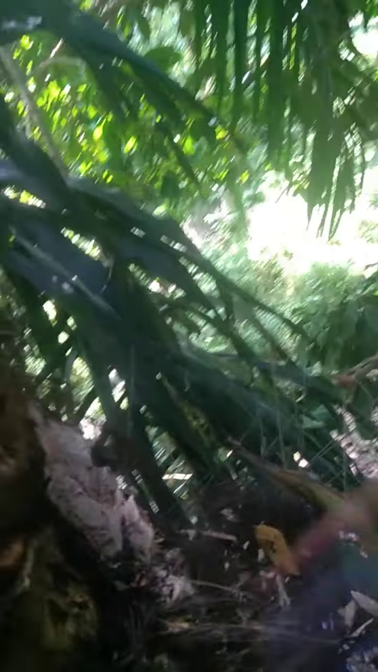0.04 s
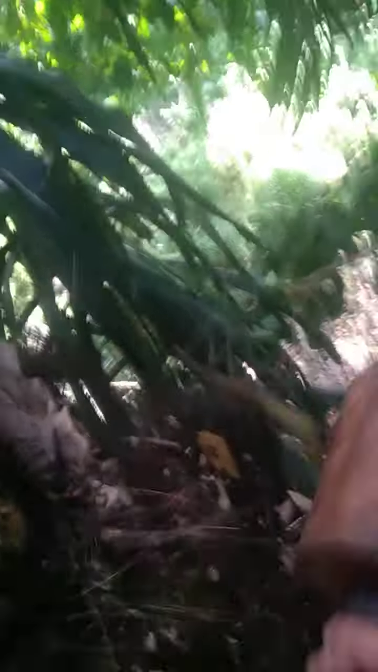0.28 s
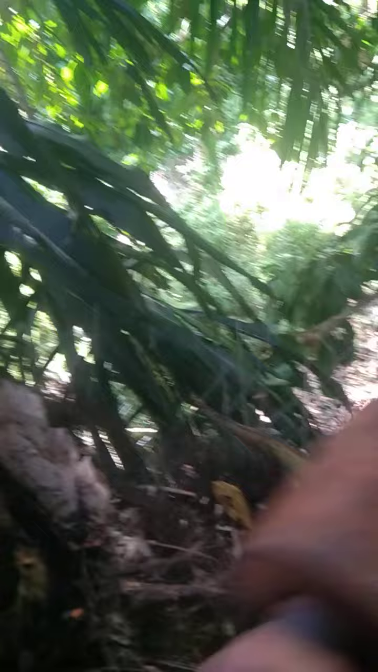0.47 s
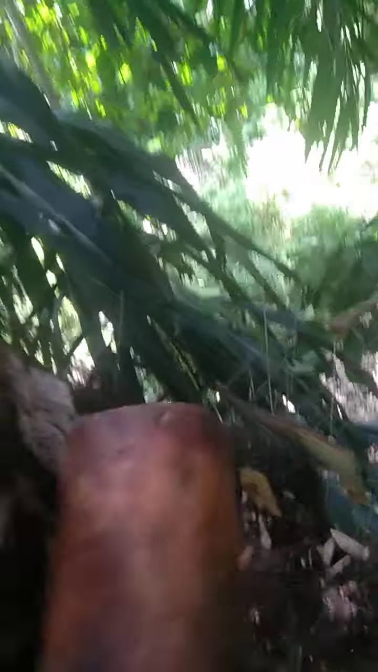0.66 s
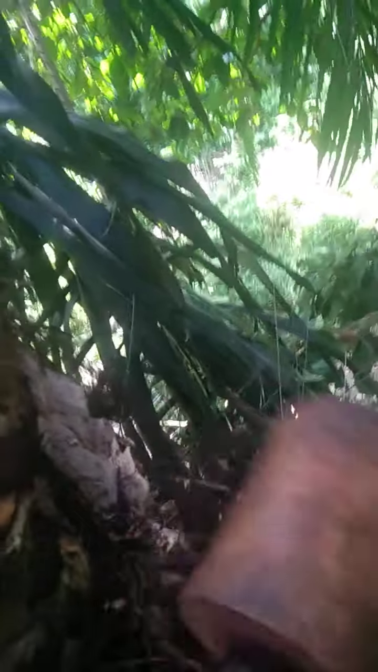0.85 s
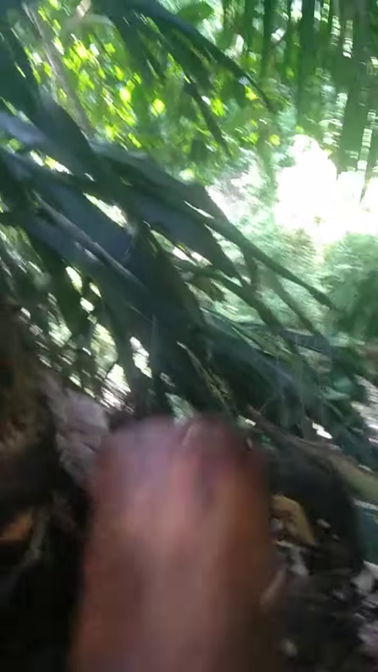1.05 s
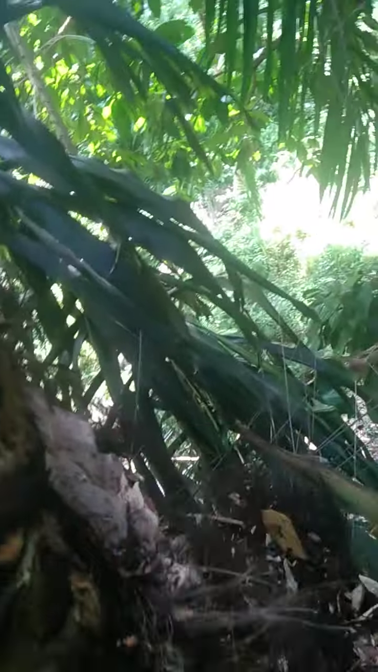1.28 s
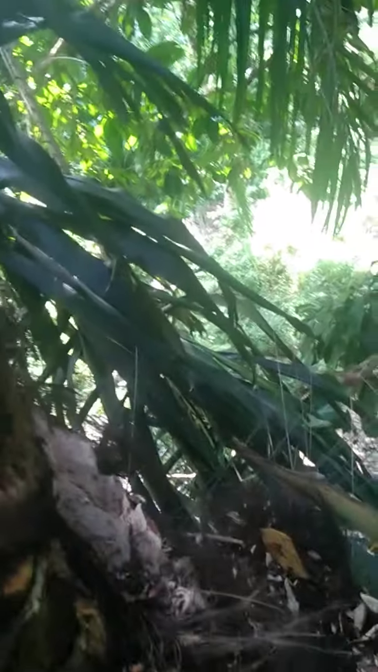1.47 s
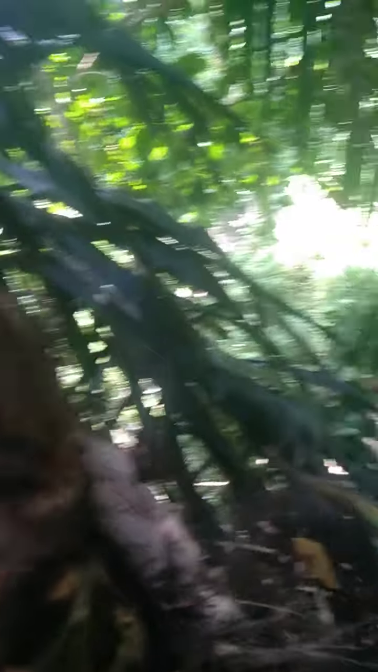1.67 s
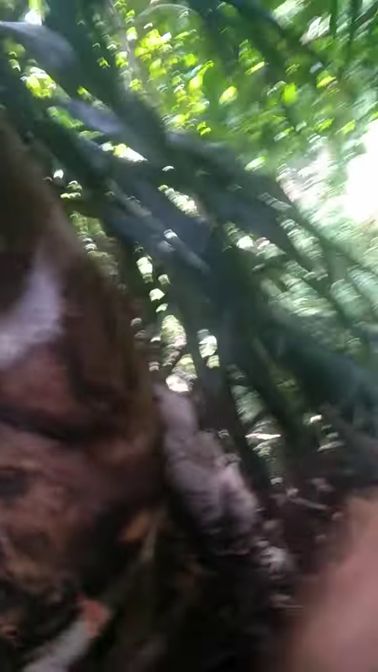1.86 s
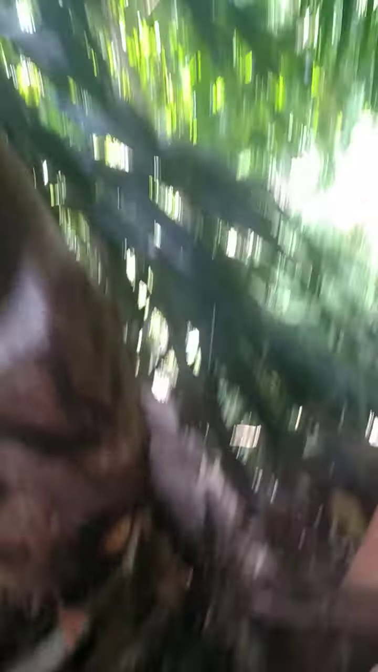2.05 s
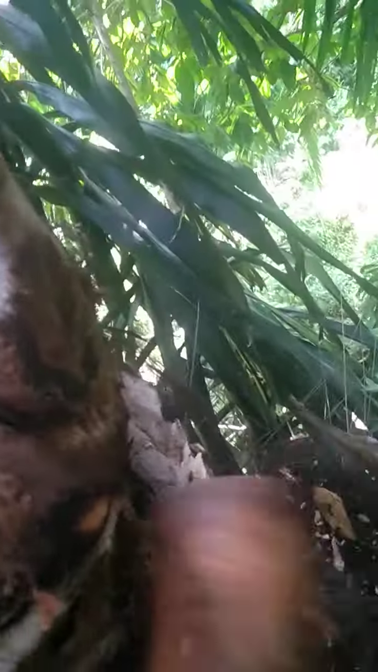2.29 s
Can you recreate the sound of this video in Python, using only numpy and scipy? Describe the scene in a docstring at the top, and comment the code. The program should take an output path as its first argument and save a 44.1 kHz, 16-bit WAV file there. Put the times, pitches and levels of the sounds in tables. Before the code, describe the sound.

Four dry, hollow wooden knocks on a plant stalk in dense forest, first and last loud and overloaded, middle two duller; the shrill insect drone dips after hard hits and swells back, with small bird chirps.

```python
"""Cicadas drone near 7 kHz throughout, over forest air and a thin band near 4.6 kHz; small ticks dot the scene.
A mallet strikes a palm stalk hard at 0.2 s, lightly at 0.7 and 1.1 s, hard at 1.9 s; birds call from 0.9 s.
Knocks are decaying modes driven by a force pulse, plus noise for scatter, fibre crack, leaves and air puff.
The rest is shaped noise, with gliding tones for the birds.
Hard blows overload the recorder, whose gain control ducks the drone and lets it swell back."""
import sys
import numpy as np
from scipy import signal
from scipy.fft import rfft, irfft
from scipy.io import wavfile
from scipy.ndimage import uniform_filter1d

SR = 44100
rng = np.random.default_rng(int(sys.argv[2]) if len(sys.argv) > 2 else 0)


def store_wav(level_fs):
    """Save 16-bit WAV to argv[1]."""
    pcm = np.round(np.clip(np.atleast_2d(level_fs), -1, 1) * 32767)
    wavfile.write(sys.argv[1], SR, pcm.T.astype(np.int16))


N = 101430

# Mallet blows. Each row: start in seconds, strength in dB, force time constant in ms,
# fibre crack level in dB, foliage scatter in dB relative to the strength.
BLOWS = [(0.2101, 14.5, 0.069, -4.5, 2.5), (0.7038, 10, .18, -20.5, -6.5), (1.1310, 6, 0.18, -22.5, -2.5),
         (1.945, 14.5, 0.089, -1, 1.5)]
# Modes of the struck stalk. Each row: frequency in Hz, level in dB, T60 in seconds.
STALK_MODES = [(216, -22, 0.09), (293.8, -3.5, 0.022), (525.4, 1, 0.03), (670.6, 0, 0.022),
               (897, -12.5, 0.045), (1030.6, 2.5, 0.014), (1145, 7, 0.016), (1363, -1.5, 0.027)]
# Spectrum of fibre crack. Each row: frequency in Hz, relative level in dB.
CRACK_SPECTRUM = [(500, -22), (2000, -5.5), (3000, -8.5), (4000, -1), (5700, 4), (7000, -18.5),
                  (10000, -26.5), (16000, -34)]
# Spectrum of shaken leaves. Each row: frequency in Hz, relative level in dB.
RUSTLE_SPECTRUM = [(1000, -17.5), (2000, -1.5), (3500, 2.5), (5500, 5.5), (8000, -3.5), (11000, -9.5),
                   (16000, -18.5)]
# Spectrum scattered by nearby fronds. Each row: frequency in Hz, relative level in dB.
FRONDS_SPECTRUM = [(60, -49), (200, -6.5), (330, -4.5), (650, -4.5), (850, 0.5), (1100, 6), (1400, 3),
                   (1700, -2.5), (2200, -10), (4000, -14.5), (8000, -9), (16000, -32.5)]
# Spectrum returned by far trees. Each row: frequency in Hz, relative level in dB.
TREES_SPECTRUM = [(60, -24.5), (170, -10.5), (400, -0.5), (700, -2), (1200, 6.5), (1700, 3.5), (2300, -2),
                  (5000, -12), (9000, -27), (16000, -64)]
# Handling bumps and twig ticks. Each row: start in seconds, level in dB, centre in Hz,
# Gaussian sigma in octaves, decay constant in seconds.
TICKS = [(0.029, -43, 5060, 1, .002), (0.087, -47, 514, 0.23, 0.0057), (0.135, -46, 990, 0.79, 0.0044),
         (0.35, -25, 102, 0.7, 0.0085), (0.812, -46.5, 2060, 0.3, 0.0028),
         (1.013, -36, 518.3, 0.13, 0.0022), (1.360, -36, 4460, 0.46, 0.001),
         (2.034, -24, 117, 0.46, 0.0056)]
# Spectrum of cicada chorus. Each row: frequency in Hz, relative level in dB.
CICADA_SPECTRUM = [(4000, -65), (5700, -34), (6300, -14), (6750, -4), (7100, -2), (7450, -7.5),
                   (7900, -20.5), (8300, -35.5), (12000, -35.5), (13200, -27), (14300, -19), (15500, -24.5),
                   (16500, -38.5)]
# Bird notes. Each row: start in seconds, length in seconds, first pitch in Hz, last pitch in Hz,
# blur width in Hz, level in dB.
BIRD_NOTES = [(.9, 0.17, 2874, 3060, 1100, -59), (1.179, 0.147, 2130, 2110, 59.4, -58.5),
              (1.717, 0.12, 5300, 6200, 907, -43.5), (1.738, .13, 5500, 5900, 1340, -45),
              (1.884, 0.069, 4800, 5310, 609, -44.5)]
# Spectrum of forest air. Each row: frequency in Hz, relative level in dB.
AIR_SPECTRUM = [(20, -35.5), (45, -18.5), (90, -1), (150, -4), (350, -5), (600, -15), (1100, -15),
                (2200, -18), (3200, -25.5), (5000, -15.5), (10000, -31), (16000, -40.5)]

STALK_RISE_S, STALK_LOW_CUT_HZ = 0.00058, 186  # the narrow stalk radiates little bass
GROUND_DELAY_S, GROUND_GAIN = 0.0075, 0.53
CRACK_DECAY_S = 0.002
RUSTLE_REL_CRACK_DB, RUSTLE_RISE_S, RUSTLE_T60_S = -20.5, 0.068, 0.37
FLUTTER_RMS_DB, FLUTTER_HZ = 0.92, 150
FRONDS_DB, FRONDS_HOLD_S, FRONDS_T60_S = -16, 0.036, 0.18
TREES_DB, TREES_LOW_T60_S, TREES_TREBLE_T60_S, TREES_SPLIT_HZ = -25.5, 0.86, 0.53, 1080
SCATTER_RISE_S = 0.022
PUFF_REL_BLOW_DB, PUFF_S, PUFF_HZ = -48.5, 0.037, 83.33
CICADA_DB, WAVER_RMS_DB, WAVER_HZ = -37, 0.6, 9.3
BUZZ_MEAN_HZ, BUZZ_DEPTH, BUZZ_JITTER, BUZZ_JITTER_HZ = 166.7, 0.1, 0.072, 8.47
THIN_HZ, THIN_WIDTH_HZ, THIN_DB = 4580, 300, -65.5
AIR_DB = -52
LOW_CUT_HZ, TREBLE_HZ, EDGE_HZ = 40, 9000, 16000
DUCK_ABOVE_DB, DUCK_MAX_DB, DUCK_DETECT_S = -4, 17, 0.0012
DUCK_ATTACK_S, RECOVER_DB_PER_S = 0.034, 15
CEILING = 0.65  # full scale = 1
LIMIT_ABOVE_DB, LIMIT_SLOPE, LIMIT_S = -12, 0.65, 0.0081
GATE_DB, GATE_FLOOR_GAIN = -85, 0.05


def amp(db):
    """Decibels to gain."""
    return 10 ** (np.asarray(db) / 20)


def unit(x):
    """Scales to rms 1."""
    return x / np.sqrt(np.mean(x ** 2) + 1e-20)


def add(mix, start_s, sound):
    """Mixes a sound in at a time, cut at the end of the mix."""
    part = mix[max(round(start_s * SR), 0):][:len(sound)]
    part += sound[:len(part)]


def noise(shape, size=N):
    """Noise of rms 1 whose gain is a function of frequency."""
    f_hz = np.fft.rfftfreq(size, 1 / SR) + 1  # offset keeps logs finite
    spectrum = rfft(rng.standard_normal(size))
    return unit(irfft(spectrum * shape(f_hz), size))


def coloured(points, size=N):
    """Noise with a spectrum interpolated over log frequency."""
    hz, db = np.transpose(points)
    return noise(lambda f: amp(np.interp(np.log(f), np.log(hz), db)), size)


def drift(hz):
    """Low-pass noise of rms 1, Gaussian roll-off."""
    return noise(lambda f: np.exp(-(f / hz) ** 2))


def lag(x, seconds):
    """One-pole smoothing."""
    r = np.exp(-1 / (seconds * SR))
    return signal.lfilter([1 - r], [1, -r], x)


def fade(t, t60_s):
    """Exponential decay, 60 dB in t60_s."""
    return np.exp(-np.log(1000) * t / t60_s)


def butter(x, order, hz, kind="low"):
    """Causal Butterworth filter."""
    return signal.sosfilt(signal.butter(order, hz, kind, fs=SR, output="sos"), x)


def mallet():
    """A force pulse drives stalk and foliage; a shorter pulse is brighter."""
    out = np.zeros(N)
    knock, scatter = stalk(), foliage()
    t = np.arange(SR // 20) / SR
    for start_s, db, force_ms, crack_db, scatter_db in BLOWS:
        force = t ** 3 * np.exp(-t * 1000 / force_ms)
        response = knock + amp(scatter_db) * scatter
        add(out, start_s, amp(db) * signal.fftconvolve(response, force / force.sum()))
        add(out, start_s, amp(crack_db) * crack(t))
        add(out, start_s, amp(crack_db + RUSTLE_REL_CRACK_DB) * rustle())
    return out


def stalk():
    """Impulse response: decaying modes with weak bass, plus a reflection off the ground."""
    t = np.arange(SR) / SR
    ring = sum(amp(db) * np.sin(2 * np.pi * hz * t) * fade(t, t60_s) for hz, db, t60_s in STALK_MODES)
    ring = butter(ring * (1 - np.exp(-t / STALK_RISE_S)), 3, STALK_LOW_CUT_HZ, "high")
    knock = ring.copy()
    add(knock, GROUND_DELAY_S, GROUND_GAIN * ring)
    return knock


def foliage():
    """Impulse response: scatter from fronds, then a faint tail from trees whose treble dies sooner."""
    t = np.arange(SR) / SR
    rise = np.minimum(t / SCATTER_RISE_S, 1) ** 2
    near = coloured(FRONDS_SPECTRUM, SR) * fade(np.maximum(t - FRONDS_HOLD_S, 0), FRONDS_T60_S)
    far = coloured(TREES_SPECTRUM, SR)
    low = signal.sosfiltfilt(signal.butter(4, TREES_SPLIT_HZ, fs=SR, output="sos"), far)
    tail = low * fade(t, TREES_LOW_T60_S) + (far - low) * fade(t, TREES_TREBLE_T60_S)
    return rise * (amp(FRONDS_DB) * near + amp(TREES_DB) * tail)


def crack(t):
    """Fibres crack: a noise burst with instant onset."""
    return coloured(CRACK_SPECTRUM, len(t)) * np.exp(-t / CRACK_DECAY_S)


def rustle():
    """Leaves shake: noise that swells, flutters and dies."""
    t = np.arange(SR) / SR
    flutter = amp(FLUTTER_RMS_DB * drift(FLUTTER_HZ)[:SR])
    shake = np.minimum(t / RUSTLE_RISE_S, 1) * fade(t, RUSTLE_T60_S) * flutter
    return coloured(RUSTLE_SPECTRUM, SR) * shake


def swings():
    """The mallet pushes air: a low noise puff around each blow, scaled by its strength."""
    t = np.arange(N) / SR
    level = sum(amp(db + PUFF_REL_BLOW_DB) * np.exp(-abs(t - start_s) / PUFF_S)
                for start_s, db, *_ in BLOWS)
    return level * noise(lambda f: np.exp(-np.log2(f / PUFF_HZ) ** 2))


def ticks():
    """Short noise grains: dull bumps and dry ticks before, between and after the blows."""
    t, out = np.arange(SR // 5) / SR, np.zeros(N)
    for start_s, db, hz, octaves, decay_s in TICKS:
        grain = noise(lambda f: np.exp(-.5 * (np.log2(f / hz) / octaves) ** 2), len(t))
        envelope = t / decay_s * np.exp(1 - t / decay_s)  # peak 1
        add(out, start_s, amp(db) * grain * envelope)
    return out


def birds():
    """Distant gliding tones, blurred by leaves: random modulation widens each pitch."""
    out = np.zeros(N)
    for start_s, length_s, first_hz, last_hz, width_hz, db in BIRD_NOTES:
        u = np.arange(0, length_s, 1 / SR) / length_s
        pitch_hz = first_hz + (last_hz - first_hz) * u
        tone = np.exp(2j * np.pi * np.cumsum(pitch_hz) / SR)
        blur = (drift(width_hz / 2) + 1j * drift(width_hz / 2))[:len(u)]
        envelope = np.sqrt(abs(np.sin(np.pi * u)))
        add(out, start_s, amp(db) * unit((tone * blur).real) * envelope)
    return out


def cicadas():
    """Many cicadas blur into one noise band, amplitude-modulated at an unsteady buzz rate."""
    rate_hz = BUZZ_MEAN_HZ * (1 + BUZZ_JITTER * drift(BUZZ_JITTER_HZ))
    buzz = 1 + BUZZ_DEPTH * np.sin(2 * np.pi * np.cumsum(rate_hz) / SR)
    level = amp(CICADA_DB + WAVER_RMS_DB * drift(WAVER_HZ))
    return level * unit(coloured(CICADA_SPECTRUM) * buzz)


def thin_band():
    """Faint steady narrow-band noise below the cicadas."""
    return amp(THIN_DB) * noise(lambda f: np.exp(-(2 * (f - THIN_HZ) / THIN_WIDTH_HZ) ** 2))


def air():
    """Forest background: steady coloured noise."""
    return amp(AIR_DB) * coloured(AIR_SPECTRUM)


def scene():
    """Knocks over the sounds of the forest."""
    return (mallet() + swings() + ticks() + birds() + cicadas() + thin_band() + air())[None]


def level_db(x, seconds):
    """Smoothed power in dB."""
    return 10 * np.log10(lag(x ** 2, seconds) + 1e-12)


def duck(x):
    """Slow gain control: loud sound lowers the gain, which recovers at a fixed dB rate."""
    over_db = np.clip(level_db(x, DUCK_DETECT_S) - DUCK_ABOVE_DB, 0, DUCK_MAX_DB)
    recovery_db = np.arange(N) / SR * RECOVER_DB_PER_S
    held_db = np.maximum.accumulate(over_db + recovery_db) - recovery_db
    return x / amp(lag(held_db, DUCK_ATTACK_S))


def overload(x):
    """Saturation, near linear up to a sharp knee."""
    return x / (1 + (x / CEILING) ** 8) ** (1 / 8)


def limit(x):
    """Quick limiter: removes a share of the excess dB."""
    return x / amp(LIMIT_SLOPE * np.maximum(level_db(x, LIMIT_S) - LIMIT_ABOVE_DB, 0))


def suppress(x):
    """Noise suppressor: turns down time-frequency cells whose smoothed power is below a threshold."""
    z = signal.stft(x, nperseg=512)[2]
    power = uniform_filter1d(uniform_filter1d(abs(z) ** 2, 5, axis=0), 5, axis=1)
    excess = (power / amp(GATE_DB) ** 2) ** 2
    gain = (GATE_FLOOR_GAIN + excess) / (1 + excess)
    return signal.istft(z * gain, nperseg=512)[1][:N]


def record(dry):
    """Recorder chain: low cut, gain control, overload, limiter, treble roll-off, suppressor, band limit."""
    x = butter(dry[0], 2, LOW_CUT_HZ, "high")
    x = limit(overload(duck(x)))
    x = suppress(butter(x, 2, TREBLE_HZ))
    band_limit = signal.firwin(255, EDGE_HZ, window=("kaiser", 9), fs=SR)
    return signal.oaconvolve(x, band_limit, "same")[None]


dry = scene()
out = record(dry)
store_wav(out)
```